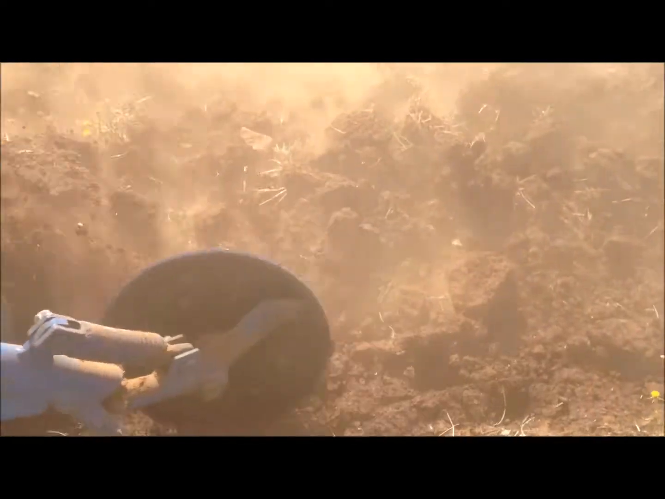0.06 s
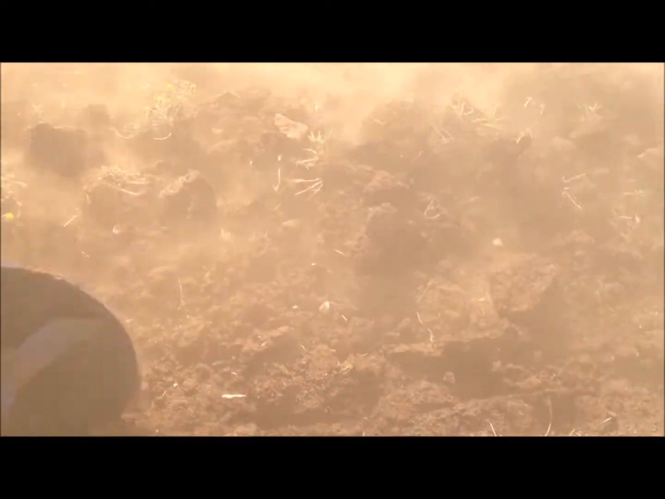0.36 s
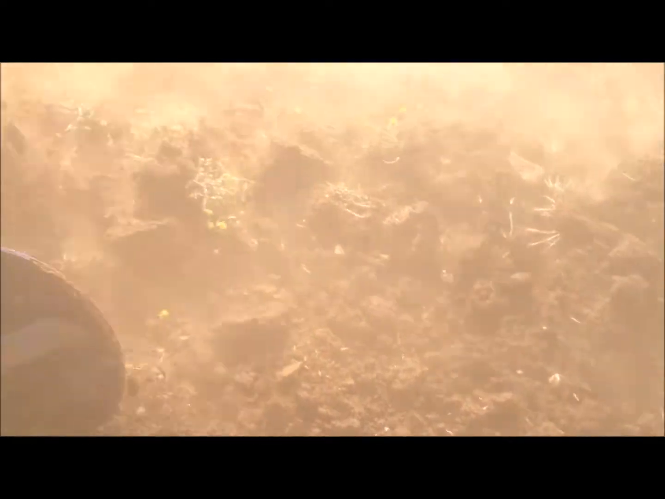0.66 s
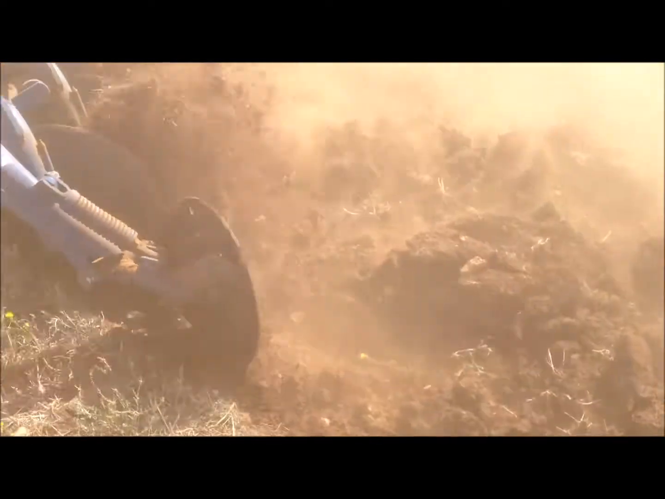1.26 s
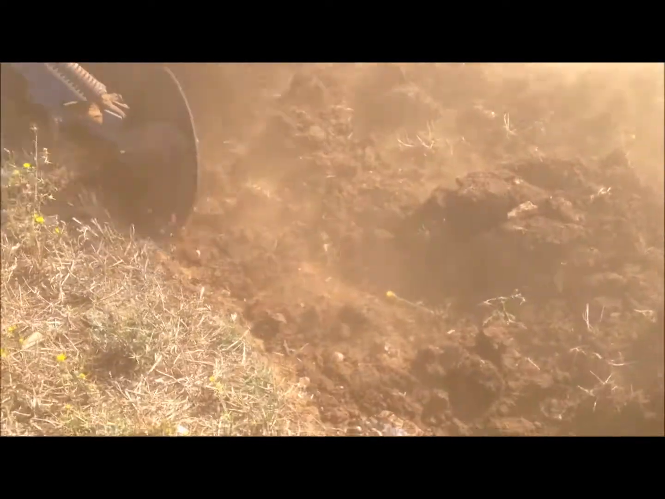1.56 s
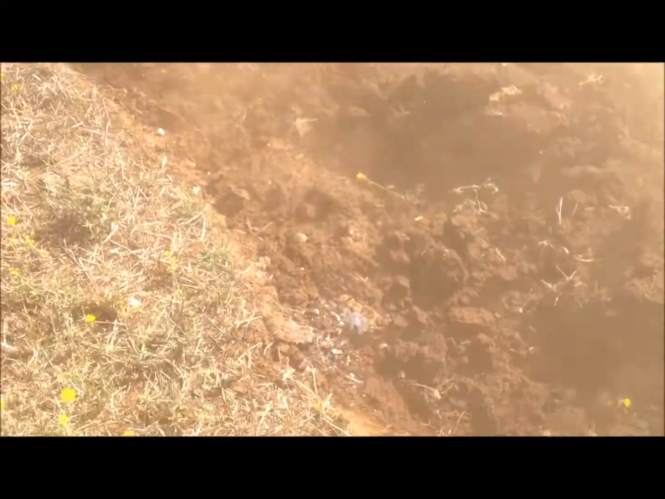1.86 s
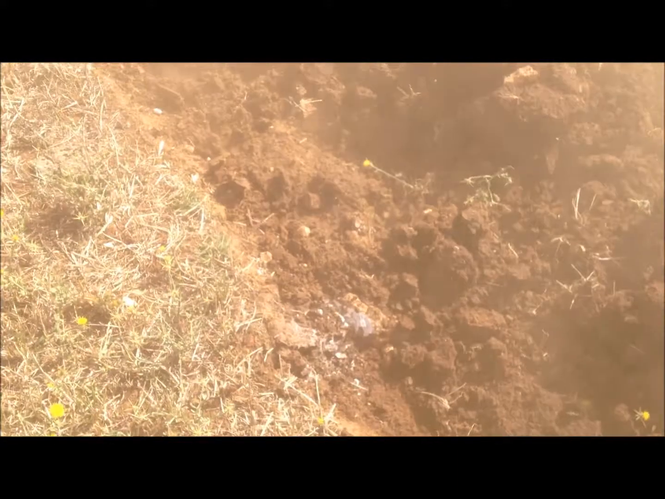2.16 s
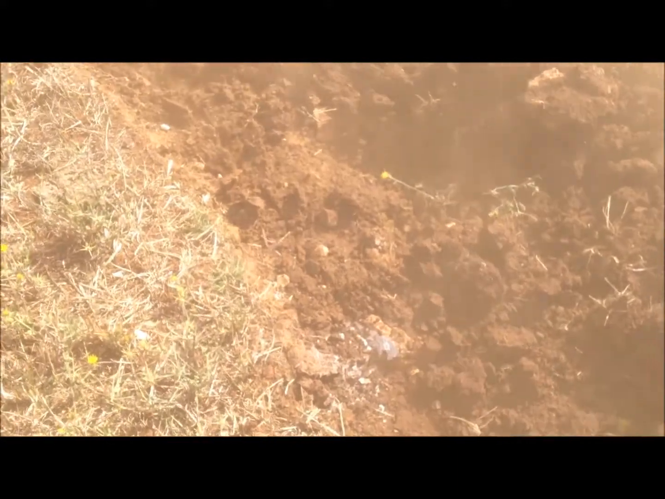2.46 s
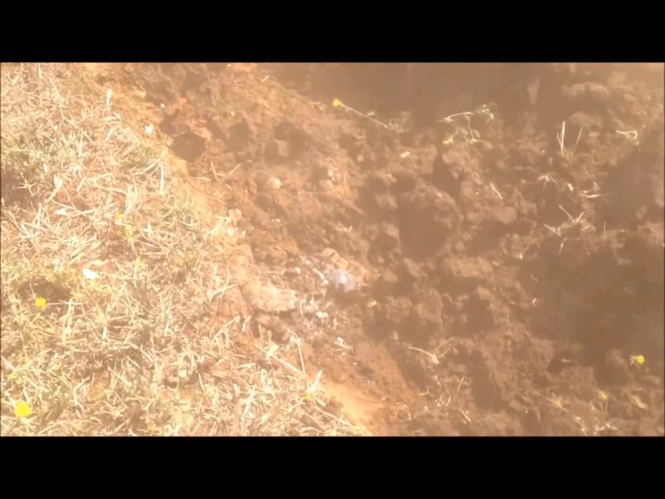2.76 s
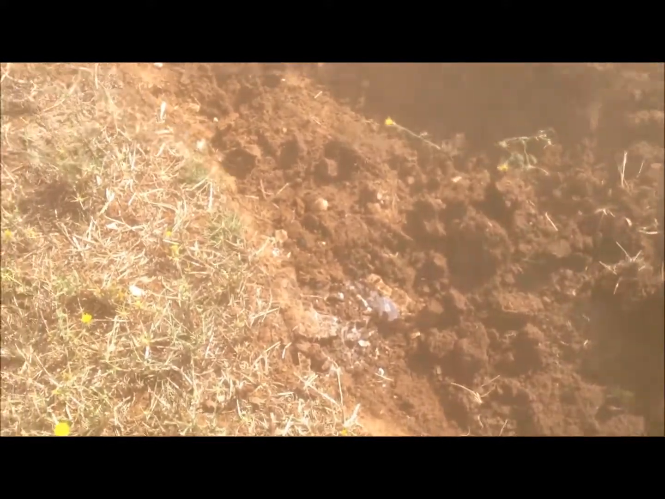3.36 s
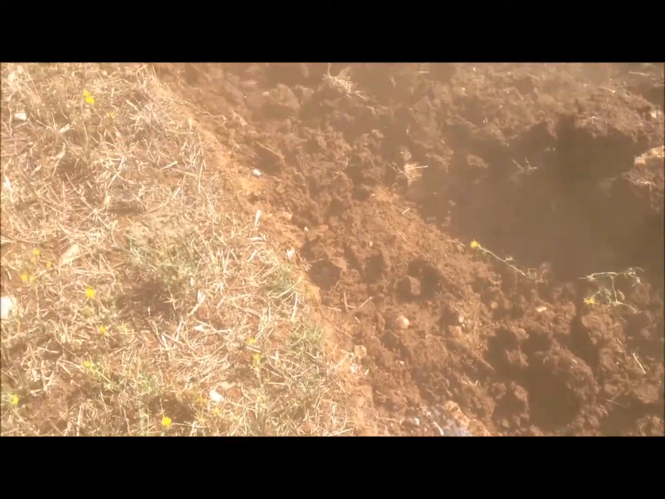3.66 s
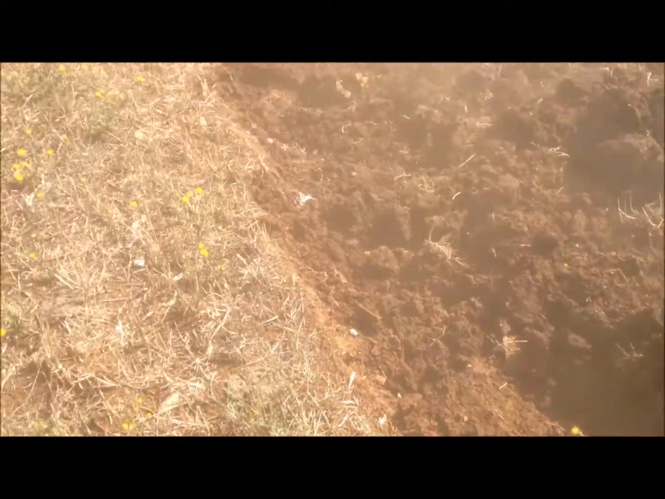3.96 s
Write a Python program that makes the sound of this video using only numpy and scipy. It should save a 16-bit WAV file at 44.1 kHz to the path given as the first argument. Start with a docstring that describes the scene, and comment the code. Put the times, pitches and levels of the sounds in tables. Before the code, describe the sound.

A tractor drags a disc plough through stony soil, rumbling, crunching and knocking.

```python
"""A diesel tractor drags a disc plough past through dry, stony soil and moves off.
The engine drones and the frame rumbles at the firing rate; earth crumbles and clods thump.
Stones grind and knock on the steel discs, which ring and now and then squeal by stick and slip.
Later a loose hitch link rattles. The sound drops out briefly at the start."""
import sys
import numpy as np
from scipy import signal
from scipy.fft import rfft, irfft
from scipy.io import wavfile
from scipy.ndimage import uniform_filter1d, minimum_filter1d

SR = 44100
rng = np.random.default_rng(int(sys.argv[2]) if len(sys.argv) > 2 else 0)


def output_pcm(signal):
    """Save a mono or channel-first signal as 16-bit PCM at the path in sys.argv[1].

    Samples are clipped to [-1, 1] before scaling.
    """
    pcm = np.clip(np.atleast_2d(signal).T, -1, 1) * 32767
    wavfile.write(sys.argv[1], SR, np.round(pcm).astype(np.int16))


N = 176400
T = np.arange(N) / SR


def from_db(db):
    """Decibels to gain."""
    return 10 ** (np.asarray(db) / 20)


def unit_rms(x):
    """Scale to unit power."""
    return x / np.sqrt(np.mean(x ** 2) + 1e-20)


def curves(rows):
    """Interpolate each column after the time, sample by sample."""
    times_s, *columns = np.transpose(rows)
    return [np.interp(T, times_s, column) for column in columns]


def drift(rate_hz):
    """Smooth random wander, spread 1."""
    pole = np.exp(-80 * np.pi * rate_hz / SR)
    noise = rng.standard_normal(N // 40 + 2002)
    slow = signal.lfilter([1], [1, -2 * pole, pole * pole], noise)[2000:]
    return np.interp(np.arange(N) / 40, np.arange(len(slow)), unit_rms(slow))


def colour(x, spectrum):
    """Impose a smooth spectrum; unit power."""
    hz, db = np.transpose(spectrum)
    bins_hz = np.maximum(np.fft.rfftfreq(N, 1 / SR), 1)
    gain = from_db(np.interp(np.log(bins_hz), np.log(hz), db))
    return unit_rms(irfft(rfft(x) * gain, N))


def ring(force, hz, t60_s):
    """One mode: a unit click starts a decaying sine of height 1."""
    pole, step = np.exp(-np.log(1000) / (t60_s * SR)), 2 * np.pi * hz / SR
    return signal.lfilter([0, np.sin(step)], [1, -2 * pole * np.cos(step), pole * pole], force + 1e-18)


def rubbed_steel(force, modes, shift_db=4, shift_hz=7):
    """Steel rings under a rubbing force; the moving contact favours different modes."""
    out = np.zeros(N)
    for k, (hz, db, t60_s) in enumerate(modes):
        coupling = unit_rms(from_db(shift_db * np.tanh(drift(shift_hz)) * np.sqrt(2)))
        out += (-1) ** k * from_db(db) * ring(force * coupling, hz, t60_s) / np.sqrt(t60_s * SR / 6)
    return out


def grains(per_s, spread_db, friction=0.26):
    """Random clicks of uneven size over smooth friction noise; unit power."""
    sizes = from_db(spread_db * np.minimum(rng.exponential(1, N), 5)) * rng.choice([-1, 1], N)
    clicks = unit_rms(sizes * (rng.random(N) < per_s / SR))
    return unit_rms(clicks + friction * rng.standard_normal(N))


def contact(start_s, length_s, bite_s=0.0044, release_s=0.011):
    """Contact envelope: quick bite, hold, release."""
    bite = np.clip((T - start_s) / bite_s, 0, 1)
    return bite * np.exp(-np.clip((T - start_s - length_s) / release_s, 0, 20))


def unsteady_phase(hz, wander, rate_hz):
    """Phase of a slightly unsteady oscillation."""
    return 2 * np.pi * np.cumsum(hz * (1 + wander * drift(rate_hz))) / SR


# Engine orders. Each row: multiple of the firing rate, peak level in dB re the rumble.
ENGINE_ORDERS = [(1, -28.5), (2, -12.5), (3, -8.5), (4, -13.5), (5, -26.5)]
# Frame rumble. Each row: frequency in Hz, spectral density in dB.
RUMBLE_SPECTRUM = [(25, -36.5), (55, -44), (95, -17), (145, -1), (200, 2.5), (270, 1), (340, -7),
                   (420, -3.5), (520, -16), (900, -32), (2500, -60)]
# Running-gear whine. Each row: time in seconds, level in dB.
WHINE_LEVELS = [(0, -40.5), (1.9, -39.5), (2.25, -43.5), (2.5, -50), (3.1, -47.5), (3.3, -44.5), (3.4, -46),
                (3.5, -42.5), (3.57, -50), (3.65, -40.5), (3.82, -35.5), (3.87, -48), (4, -40)]


def tractor(rumble_db, firing_hz=79.36, whine_hz=1133):
    """Diesel firing orders over a throbbing rumble, with a thin whine from the running gear."""
    firing = unsteady_phase(firing_hz, wander=0.006, rate_hz=1.96)
    orders = np.zeros(N)
    for order, db in ENGINE_ORDERS:
        orders += from_db(db + 0.5 * drift(2.8)) * np.sin(order * firing + rng.uniform(0, 2 * np.pi))
    throb = (1 + 0.31 * np.cos(firing)) * from_db(drift(9.4))
    rumble = colour(rng.standard_normal(N) * throb, RUMBLE_SPECTRUM)
    gear = unsteady_phase(whine_hz, wander=0.00785, rate_hz=19.9)
    whine = from_db(curves(WHINE_LEVELS)[0]) * np.sin(gear)
    whine += from_db(-63 + 2 * drift(11)) * np.sin(gear / 2)
    return from_db(rumble_db) * (rumble + orders) + np.sqrt(2) * whine


# Crumbling earth and fine grit. Each row: frequency in Hz, spectral density in dB.
SOIL_SPECTRUM = [(200, -32), (500, 0.5), (900, 6), (1300, -1.5), (1520, 2.5), (1720, 9.5), (2100, -4.5),
                 (2800, -14.5), (4200, -19), (6000, -36), (12000, -41)]
FINE_GRIT_SPECTRUM = [(1000, -31), (2500, 13.5), (4200, 1), (5300, -9), (8000, -11), (10500, -22.5),
                      (15000, -17.5)]
# Steel disc modes. Each row: frequency in Hz, level in dB, free T60 in seconds.
DISC_MODES = [(1457, -10, .2), (1635, -4, .16), (1715, -1, .2), (1815, -2, .1), (1985, -7, .18),
              (2228, -9, .18), (2461, -5, .14), (2763, -8, .18), (3060, -13, .18), (3407, -10, .16),
              (3531, -16, .18), (3911, -10, .16), (4015, -15, .14), (4490, -14, .09)]


def soil(soil_db, grit_db, flicker_db=1.6, rub_db=-12.5, pebbles_per_s=13):
    """Dry earth crumbles, trickles and rubs the discs; lone pebbles tick on the steel."""
    flow = from_db(flicker_db * drift(22.4))
    crumbs, dust, rub = [grains(per_s=4000, spread_db=2.4) * flow for _ in range(3)]
    pebbles = (rng.random(N) < pebbles_per_s / SR) * rng.uniform(0.3, 1, N) * from_db(2.5)
    ticks = sum(ring(pebbles * rng.standard_normal(N), hz, t60_s=0.02) for hz, _, _ in DISC_MODES)
    steel = rubbed_steel(from_db(rub_db) * rub, DISC_MODES) + ticks / len(DISC_MODES)
    earth = from_db(soil_db) * (colour(crumbs, SOIL_SPECTRUM) + steel)
    return earth + from_db(grit_db) * colour(dust, FINE_GRIT_SPECTRUM)


FRACTURES_PER_S, FRACTURE_SPREAD_DB, DISC_HIGH_T60_S = 3500, 3.5, 0.08
# Stone thud, crunch and grit. Each row: frequency in Hz, spectral density in dB.
THUD_SPECTRUM = [(25, -40), (70, -28), (130, -6), (250, 3.5), (400, -1.5), (600, -11), (2000, -66.5)]
CRUNCH_SPECTRUM = [(150, -50.5), (400, -18), (650, 0.5), (900, 7), (1300, -11.5), (1800, 0), (2200, -14.5),
                   (3000, -25.5), (5000, -27), (12000, -58.5)]
STONE_GRIT_SPECTRUM = [(1000, -21), (2500, 7.5), (4200, 4.5), (6000, -5), (8000, -17.5), (10500, -22.5),
                       (12500, -17), (15000, -17.5)]
# Plough frame modes. Each row: frequency in Hz, level in dB, free T60 in seconds.
FRAME_MODES = [(238, -5.5, 0.12), (430, -12.5, 0.054), (646, -13, 0.11), (775, -4.5, 0.065),
               (895, -7.5, 0.076), (993, 0, 0.091), (1070, -2, 0.038), (1297, -9, 0.088),
               (2660, -22.5, 0.031), (2970, -23, 0.056)]
# High, glassy disc modes. Each row: frequency in Hz, level in dB.
DISC_HIGH_MODES = [(5070, -4), (5700, 0), (6270, -6), (6440, -5), (6890, -9), (7210, -8), (7890, -11),
                   (8666, -10), (10300, -9), (11700, -14), (12190, -12), (13100, -14), (13615, -12),
                   (14700, -12)]
# Stones on the discs. Each row: start and length in seconds, then thud, crunch, disc and grit drive in dB.
STONE_GRINDS = [(0, 0.0086, -6, -15, -34, -36), (0.125, 0.039, -16.5, -16, -29, -42),
                (0.241, 0.023, -26, -26.5, -27, -37.5), (0.4, 0.0096, -24, -32, -30, -34),
                (0.536, 0.022, -21, -28, -26, -28.5), (0.697, 0.021, -18, -13, -20.5, -44),
                (0.744, .008, -36, -33, -24, -27.5), (0.768, 0.011, -20, -17, -19, -30),
                (0.785, 0.014, -14.5, -15, -25, -24), (0.812, 0.051, -24.5, -25.5, -15.5, -24),
                (1.087, 0.02, -20, -20.5, -19.5, -30), (1.122, 0.063, -33, -23.5, -30.5, -32),
                (1.176, 0.021, -38, -24.5, -21.5, -27.5), (1.238, 0.032, -33, -30, -35, -41),
                (1.319, 0.0087, -23, -22.5, -31, -41), (1.386, 0.047, -31, -29.5, -35, -40),
                (1.498, 0.0089, -22, -19, -34, -34), (1.606, 0.011, -25, -15.5, -19, -29.5),
                (1.623, 0.011, -19.5, -11, -18, -31.5), (1.642, 0.037, -24.5, -21, -21, -29),
                (1.707, 0.065, -30.5, -28, -26, -38), (1.795, 0.02, -23.5, -22.5, -26, -38),
                (1.814, 0.02, -40, -25, -29, -30.5), (1.913, 0.014, -33, -26, -30.5, -36.5),
                (2.261, 0.013, -38, -36, -33, -52), (2.321, 0.027, -38, -36, -30, -45),
                (3.144, 0.027, -39, -38, -35, -46), (3.31, 0.011, -44, -40, -30, -51),
                (3.7, 0.012, -38, -33.5, -33, -46), (3.889, 0.011, -44, -39, -35.5, -42),
                (3.952, 0.034, -22.5, -33, -59, -67)]


def stones():
    """Each stone grinds in a run of fractures that shake the frame and the discs."""
    power = sum(np.outer(from_db(drives_db), contact(start_s, length_s)) ** 2
                for start_s, length_s, *drives_db in STONE_GRINDS)
    thud, crunch, disc, grit = np.sqrt(power)
    low, mid, rub, high = [grains(FRACTURES_PER_S, FRACTURE_SPREAD_DB) for _ in range(4)]
    fractures = thud * colour(low, THUD_SPECTRUM)
    fractures += from_db(-2) * crunch * colour(mid, CRUNCH_SPECTRUM)
    fractures += from_db(-3) * grit * colour(high, STONE_GRIT_SPECTRUM)
    frame = from_db(-1.5) * rubbed_steel(crunch * rub, FRAME_MODES)
    high_modes = [(hz, db - 12.5, DISC_HIGH_T60_S) for hz, db in DISC_HIGH_MODES]
    discs = rubbed_steel(disc * rub, DISC_MODES) + rubbed_steel(grit * rub, high_modes)
    return fractures + frame + discs


def stone_rings(low_hz=3200, high_hz=8000, t60_s=0.05):
    """Each stone rings in four high modes of its own while it is ground."""
    out, force = np.zeros(N), grains(FRACTURES_PER_S, FRACTURE_SPREAD_DB)
    pitches_hz = np.exp(rng.uniform(np.log(low_hz), np.log(high_hz), size=(len(STONE_GRINDS), 4)))
    for (start_s, length_s, *_, grit_db), modes_hz in zip(STONE_GRINDS, pitches_hz):
        span = slice(int(start_s * SR), int((start_s + length_s + 2 * t60_s) * SR))
        push = from_db(grit_db - 8) * (contact(start_s, length_s) * force)[span]
        out[span] += sum(ring(push, hz, t60_s) * low_hz / hz for hz in modes_hz)
    return out / np.sqrt(t60_s * SR / 6)


# Rock strikes. Each row: start in seconds, relative level in dB, centre frequency in Hz.
ROCK_KNOCKS = [(.405, -6, 1720), (.529, -14, 1720), (.703, -8, 1720), (.712, -3, 890), (.773, -5, 1320),
               (.79, 1, 880), (.823, -16, 1730), (.846, -14, 1680), (1.092, -13, 1730), (1.136, -11, 1740),
               (1.501, -2, 680), (1.61, -10, 1810), (1.659, -3, 1640)]


def knocks(fall_db_per_octave=19.5, spread_db=2.5, t60_share=0.6):
    """A rock strikes the plough: modes near one pitch answer most, damped by stone and soil."""
    start_s, db, centre_hz = np.transpose(ROCK_KNOCKS)
    modes = FRAME_MODES + DISC_MODES + [(hz, level, DISC_HIGH_T60_S) for hz, level in DISC_HIGH_MODES]
    octaves = np.abs(np.log2(np.array(modes)[:, 0] / centre_hz[:, None]))
    shares = from_db(spread_db * rng.standard_normal(octaves.shape) - fall_db_per_octave * octaves)
    shares /= np.linalg.norm(shares, axis=1, keepdims=True)
    out = np.zeros(N)
    for k, (hz, _, t60_s) in enumerate(modes):
        blows = np.zeros(N)
        blows[(start_s * SR).astype(int)] = from_db(db) * shares[:, k]
        out += (-1) ** k * ring(blows, hz, t60_s * t60_share)
    return out / 2


# Ground modes. Each row: frequency in Hz, level in dB, T60 in seconds.
GROUND_MODES = [(160.5, -5, 0.054), (232, -4, 0.042), (326, -14.5, 0.098)]
# Falling clods. Each row: start in seconds, blow strength in dB.
CLOD_FALLS = [(.448, -27), (0.714, -11), (.8, -5), (1.343, -6), (1.351, -13), (1.389, -12), (1.463, -13.5),
              (1.993, -18), (3.393, -8.5), (3.528, -12.5), (3.554, -11), (3.842, -12.5), (3.974, -3)]


def clods(contact_hz=600, low_cut_hz=110):
    """Clods land as soft, heavy blows that ring the ground."""
    blows = np.zeros(N)
    for start_s, db in CLOD_FALLS:
        blows[int(start_s * SR)] += from_db(db)
    blows = signal.sosfilt(signal.butter(2, contact_hz, fs=SR, output="sos"), blows)
    thumps = sum((-1) ** k * from_db(db) * ring(blows, hz, t60_s)
                 for k, (hz, db, t60_s) in enumerate(GROUND_MODES))
    return signal.sosfilt(signal.butter(2, low_cut_hz, "high", fs=SR, output="sos"), thumps)


# Disc squeals. Each row: peak time, swell and fade in seconds, pitch in Hz, glide as a share of
# the pitch, level in dB, second harmonic in dB re the fundamental.
DISC_SQUEALS = [(.718, 0.0093, 0.011, 882, -.02, -10, -11), (.703, .006, .006, 2505, 0, -25.5, -35),
                (.824, 0.012, 0.012, 2600, 0.00059, -22, -34), (.826, .009, .022, 2463, -0.0012, -22, -30),
                (.833, .009, .01, 1720, 0, -17, -28), (.831, .008, .012, 5713, 0, -32, -60),
                (.845, .018, .018, 3918, 0, -29, -60), (0.857, 0.012, 0.016, 1662, -.005, -10, -35),
                (0.859, 0.012, 0.019, 8666, 0, -34, -60), (0.852, 0.012, 0.01, 10290, 0, -31.5, -60),
                (1.665, 0.0047, 0.022, 1612, 0, -6.5, -41), (1.664, .016, 0.015, 1700, -.04, -9.5, -31),
                (1.731, 0.013, 0.011, 1166, .035, -15.5, -11),
                (1.736, 0.0094, 0.0098, 2338, 0.02, -17.5, -25), (1.731, .012, .01, 2855, -0.014, -30, -30),
                (1.728, .014, 0.012, 4300, 0, -37, -30), (1.73, .012, 0.0088, 4204, -0.0073, -37, -30),
                (1.728, .011, .008, 4605, .005, -33, -60), (1.748, 0.0065, .012, 5257, 0.007, -37, -30),
                (1.766, .01, 0.014, 1086, -.025, -24, -18),
                (1.775, 0.0064, 0.0075, 2815, 0.0051, -28.5, -28),
                (1.831, 0.013, 0.023, 1713, 0, -10.5, -30.5), (1.836, 0.012, 0.011, 2212, 0, -20, -38),
                (1.834, .012, .014, 3052, 0, -32.5, -35), (1.835, .012, .014, 4016, 0, -33, -35),
                (1.838, .012, .014, 3531, 0, -35, -60), (2.345, .006, .008, 9030, -.015, -49, -60)]


def squeals(rasp_db=-14, rough_db=1.6, fall_db_per_harmonic=6, harmonic_limit_hz=5400):
    """Stick and slip pumps one disc mode, which swells, glides and fades; uneven slips make it rasp."""
    out, waver = np.zeros(N), 0.006 * drift(82)
    slips = (1 + from_db(rasp_db) * drift(600)) * from_db(rough_db * drift(126))
    for peak_s, swell_s, fade_s, hz, glide, db, second_db in DISC_SQUEALS:
        span = (T > peak_s - 10 * swell_s) & (T < peak_s + 10 * fade_s)
        t = T[span] - peak_s
        envelope = np.exp(1 - np.hypot(1, np.sqrt(2) * t / np.where(t < 0, swell_s, fade_s)))
        pitch_hz = hz * (1 + glide * np.tanh(t / (swell_s + fade_s)) + waver[span] * min(1, 4000 / hz))
        phase = 2 * np.pi * (np.cumsum(pitch_hz) / SR + rng.random())
        overtones = sum(from_db(second_db - fall_db_per_harmonic * (k - 2)) * np.sin(k * phase)
                        for k in range(2, 5) if k * hz < harmonic_limit_hz)
        out[span] += from_db(db) * envelope * slips[span] * (np.sin(phase) + overtones)
    return np.sqrt(2) * out


# Hitch modes. Each row: frequency in Hz, level in dB, T60 in seconds.
HITCH_MODES = [(390, 0, 0.07), (593, -7, 0.06), (1203, -8, 0.04), (1650, -2, 0.027), (1900, -6, .04),
               (2130, -7.5, 0.025), (2455, -8, .03), (2890, -5, 0.022), (3360, -10, .02),
               (4060, -6.5, 0.012), (4530, -20, .03)]
# Link rattles. Each row: start in seconds, length in seconds, drive in dB.
HITCH_RATTLES = [(2.726, 0.024, -23.5), (2.766, 0.016, -24), (2.795, .007, -24.5)]


def hitch():
    """A loose link rattles the hitch in short runs of metal contacts."""
    force = sum(from_db(db) * contact(start_s, length_s) for start_s, length_s, db in HITCH_RATTLES)
    return rubbed_steel(force * grains(per_s=1200, spread_db=2.5), HITCH_MODES)


# The plough draws away. Each row: time in seconds, then rumble, soil and fine grit levels in dB.
PASS_LEVELS = [(0, -25, -26, -30), (.3, -24, -27, -41), (.72, -23.5, -25, -37.5), (.95, -27.5, -29, -39.5),
               (1.2, -26.5, -29.5, -44), (1.45, -27.5, -29, -43.5), (1.57, -28, -32.5, -44),
               (1.75, -34, -34.5, -48), (1.95, -31, -32, -42.5), (2.15, -32.5, -36, -47.5),
               (2.35, -30.5, -34, -45), (2.5, -33.5, -38.5, -48.5), (2.68, -27, -35.5, -45),
               (2.9, -31.5, -37.5, -50), (3.17, -29.5, -35, -48.5), (3.5, -32.5, -36.5, -47.5),
               (3.7, -28.5, -34, -46.5), (3.82, -34.5, -35.5, -48), (4, -26, -36.5, -46)]


def scene():
    """Tractor and plough from the edge of the furrow, in mono."""
    rumble_db, soil_db, grit_db = curves(PASS_LEVELS)
    steady = tractor(rumble_db) + soil(soil_db, grit_db)
    return (steady + stones() + stone_rings() + knocks() + clods() + squeals() + hitch())[None]


def record(dry, dropout_start_s=0.02, dropout_end_s=0.1335, ceiling=0.95, cutoff_hz=15900):
    """A brief dropout, a fast limiter and a steep low-pass."""
    lost = (T > dropout_start_s) & (T < dropout_end_s)
    tail_db = -28 - 650 * (T - dropout_start_s).clip(0)
    live = dry * np.where(lost, from_db(tail_db), 1)
    gain = ceiling / np.maximum(np.abs(live), ceiling)
    gain = uniform_filter1d(minimum_filter1d(gain, size=129), size=129)
    return signal.sosfilt(signal.cheby2(16, 70, cutoff_hz, fs=SR, output="sos"), live * gain)


dry = scene()
out = record(dry)
output_pcm(out)
```